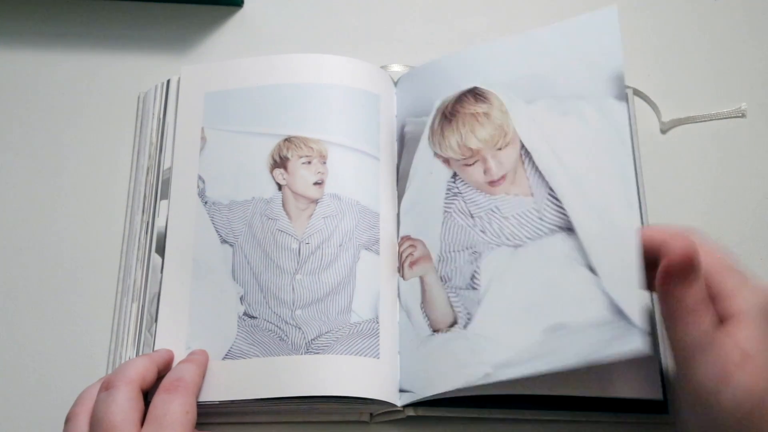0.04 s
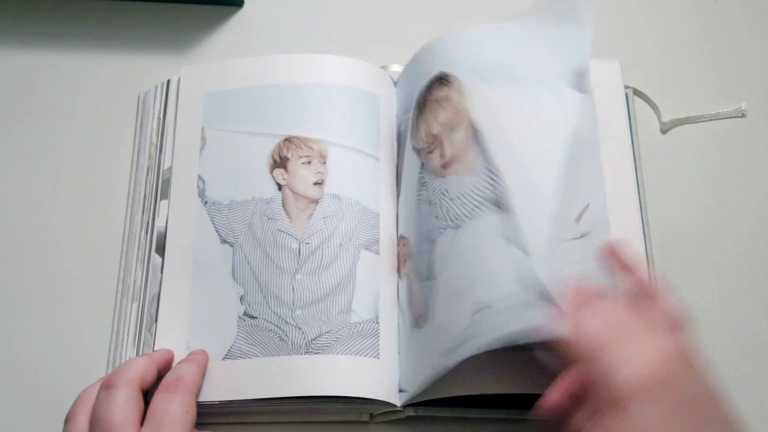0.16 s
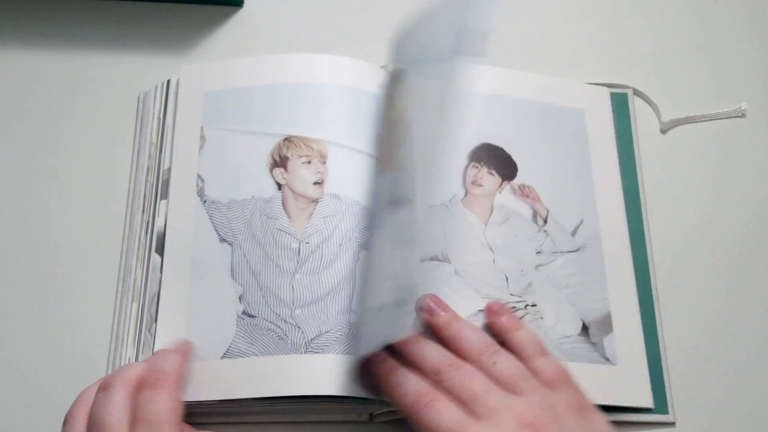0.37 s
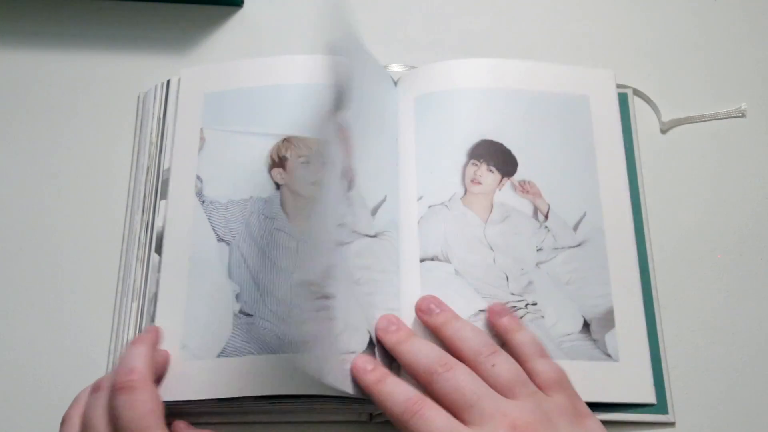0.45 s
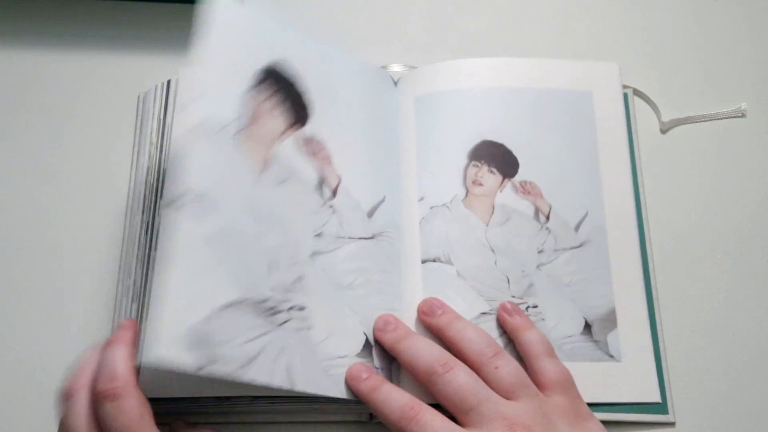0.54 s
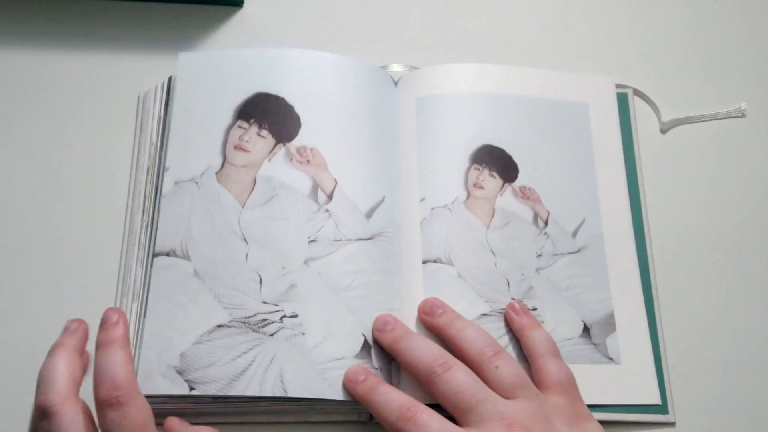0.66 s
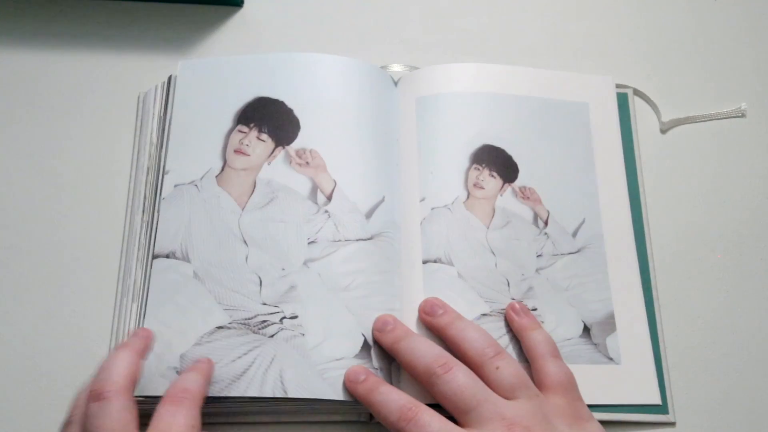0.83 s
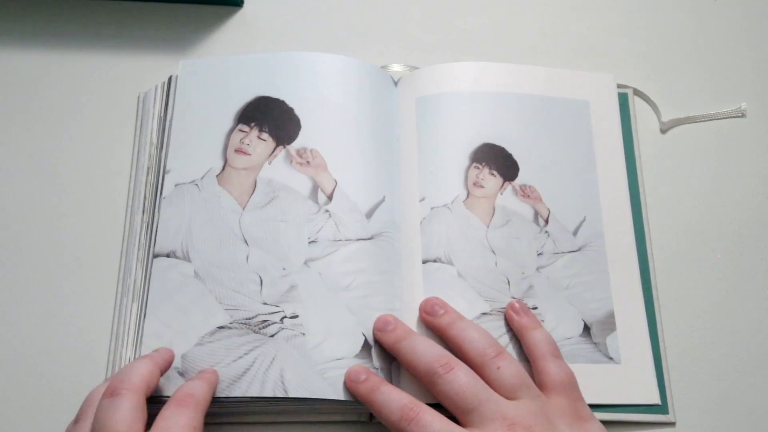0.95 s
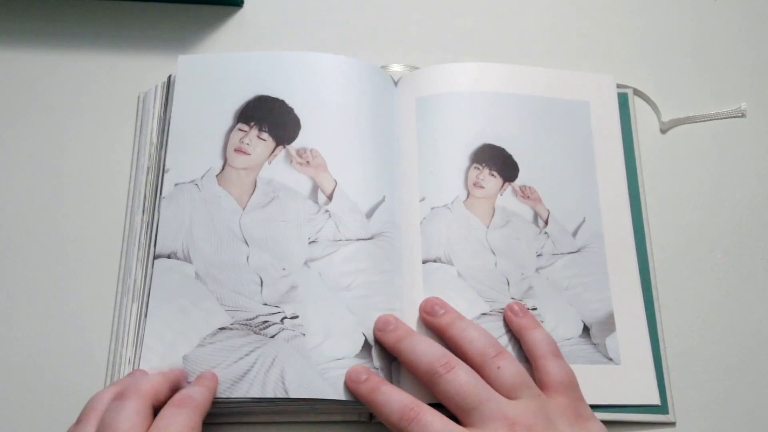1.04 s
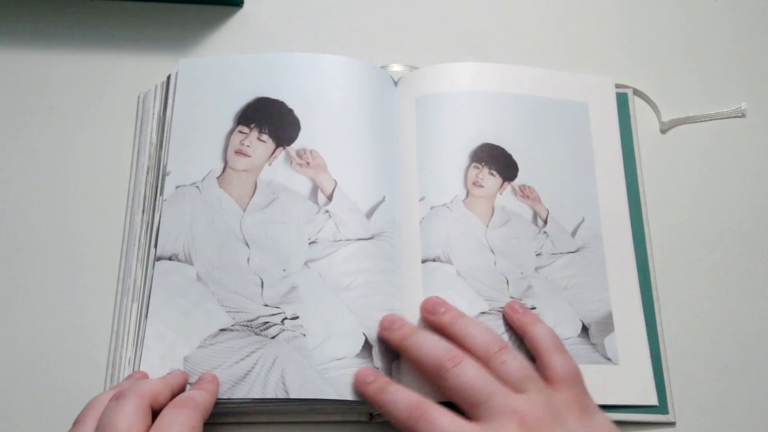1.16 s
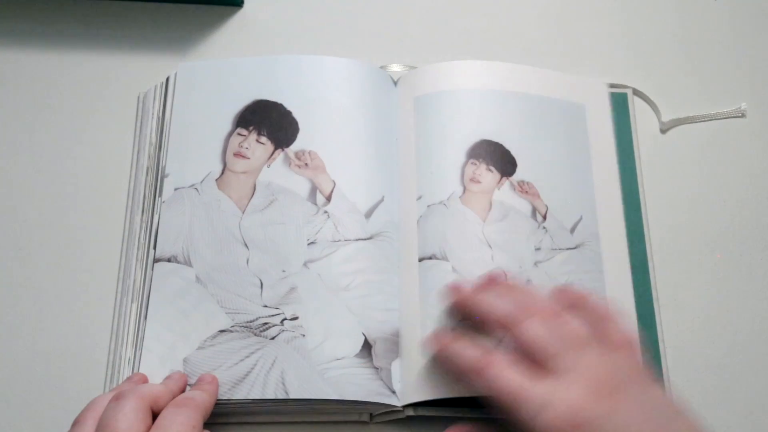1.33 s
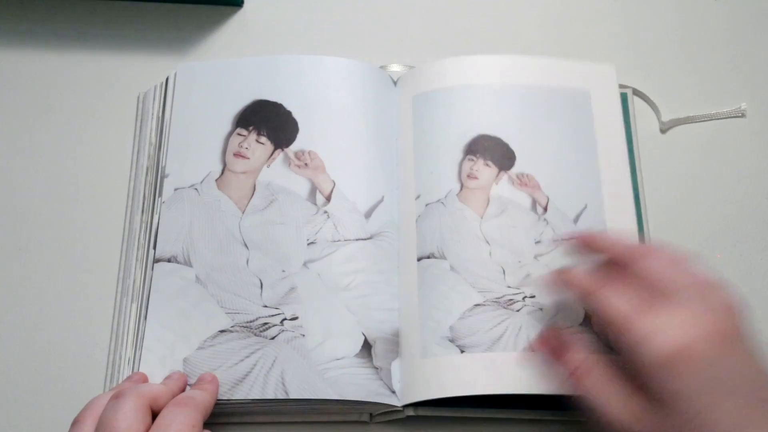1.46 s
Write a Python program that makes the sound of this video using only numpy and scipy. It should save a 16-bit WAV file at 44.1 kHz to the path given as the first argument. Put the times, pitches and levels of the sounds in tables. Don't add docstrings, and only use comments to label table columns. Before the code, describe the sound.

A stiff glossy book page turns with a sharp snap, papery crackle and soft pat

```python
import sys
import numpy as np
from scipy import signal
from scipy.fft import rfft, irfft
from scipy.io import wavfile
from scipy.ndimage import uniform_filter1d

SR = 44100
rng = np.random.default_rng(int(sys.argv[2]) if len(sys.argv) > 2 else 0)


def bounce(signal):
    frames = np.transpose(np.atleast_2d(signal))
    limited = np.clip(frames, -1, 1)
    pcm = np.round(limited * 32767).astype(np.int16)
    wavfile.write(sys.argv[1], SR, pcm)


def magnitude_from_level(level_db):
    exponent = np.asarray(level_db, float) / 20
    return 10 ** exponent


N = 66150

# start t/s, rise/s, 60 dB fall/s, level/dB, brightest f/Hz
SLIDES = [(.0, 0.0004, .28, -36, 8600), (.0, 0.0014, 0.26, -44, 750), (.1, 0.043, .4, -54, 1190),
          (.02, 0.045, .25, -48, 6300), (0.136, 0.081, 0.57, -51, 9400), (0.22, 0.027, .14, -37.5, 5700),
          (0.221, 0.022, 0.08, -47, 9300), (.325, 0.013, 1, -61, 8900), (0.443, 0.035, 0.21, -49, 6000),
          (.575, 0.015, 0.33, -59.5, 8380), (.637, 0.002, 0.17, -51, 9600), (.683, 0.008, 0.12, -54, 9300),
          (1.237, .003, .3, -65, 8600), (1.28, .01, 0.23, -67.5, 7500), (1.34, 0.081, .25, -62, 8800),
          (1.06, 0.028, .2, -72, 4870), (1.44, 0.018, 0.32, -63, 3300)]
# f/Hz, level/dB
GLOSS_COLOUR = [(88, -58), (150, -29.5), (500, -10), (1030, -14.5), (2150, -5.5), (3160, -8.5), (5670, -12),
                (12600, -18.5), (15600, -43.5)]
# start t/s, rise/s, 60 dB fall/s, level/dB, f/Hz
SQUEAKS = [(.0, 0.019, 0.23, -44.5, 2748), (.02, 0.02, 0.3, -49, 2150), (.045, 0.03, 0.14, -44.5, 5640),
           (.216, 0.0066, 0.031, -37.5, 5530), (.313, .01, 0.12, -68, 9100), (.32, .025, .3, -44.5, 370),
           (.222, 0.024, .08, -44, 9600), (.142, .01, .3, -58, 9100), (.148, .006, .1, -58, 10900),
           (1.237, .003, .2, -64, 9600), (1.237, .003, .2, -66, 7500), (.0, .004, .2, -45, 4400),
           (0.248, 0.0094, .08, -34, 3800), (.228, 0.021, .1, -39, 5550), (.475, 0.025, .18, -57, 5100),
           (0.6373, .002, 0.17, -54, 4330), (.642, .004, .06, -55, 2860), (.686, .008, .08, -63, 5680),
           (.75, 0.022, 0.056, -58.5, 2310), (.772, 0.014, 0.066, -40.5, 800), (1.05, .05, .2, -79.5, 6900),
           (1.295, .015, .2, -62.5, 900), (1.455, 0.011, .2, -67, 490), (1.27, .02, .2, -67, 3300)]
# f/Hz, level/dB
AIR_COLOUR = [(59, -61.5), (100, -33), (467, -18), (519, -16.5), (776, -15.5), (1160, -15.5), (3470, -18),
              (5300, -36.5), (15600, -41.5)]
# t/s, level/dB
FAN_SWELL = [(0, -66), (.2, -63), (.52, -66), (.67, -73), (.85, -64.5), (1.07, -68.5), (1.125, -61),
             (1.2, -70), (1.245, -76), (1.3, -67), (1.39, -64), (1.46, -70), (1.5, -75)]
# t/s, effort level/dB, stiffness f/Hz
SWING = [
    (.221, -77, 900),
    (.226, -29.5, 900),
    (.243, -30, 1090),
    (.256, -24, 1500),
    (.272, -28.5, 1340),
    (.285, -25.5, 1790),
    (.38, -30.5, 1510),
    (.47, -40, 1175),
    (.57, -66.5, 1106),
]
# t/s, effort level/dB, stiffness f/Hz
SETTLE = [
    (.694, -72, 1350),
    (.703, -40.5, 1300),
    (.745, -47, 950),
    (.762, -42, 1040),
    (.787, -46, 850),
    (.805, -56, 950),
    (.86, -74, 1000),
]
# f/Hz, level/dB
SHEET_COLOUR = [(35, -87), (60, -53), (239, -22), (321, -31.5), (372, -10), (1200, -1.5), (2670, -6.5),
                (5110, -32), (9000, -55.5), (11700, -68), (19800, -120)]
# f/Hz, level/dB
PAT_COLOUR = [(88, -72), (150, -36.5), (356, -19.5), (425, -19.5), (799, -3.5), (925, -8), (1200, -11),
              (1800, -21), (5000, -60), (6500, -80), (11000, -120)]
# t/s, level/dB, f/Hz
LIFT_CREASES = [(0.2272, -20.8, 1220), (0.2305, -19.8, 1090), (0.2373, -23.7, 1260), (0.2401, -23.3, 1090),
                (0.2432, -33.5, 1690), (0.2462, -21.6, 1170), (0.2493, -17.3, 1330), (0.2537, -15.6, 1150),
                (0.2565, -12.1, 1500), (0.2594, -16.9, 1810), (0.2632, -11.3, 2160), (0.2659, -14.6, 1570)]
# t/s, level/dB, f/Hz
SWING_CREASES = [(0.2883, -14.0, 1860), (0.3031, -16.0, 2070), (0.3067, -17.6, 1910), (0.3129, -18.9, 1940),
                 (0.318, -16.3, 1770), (0.3215, -20.2, 1320), (0.3262, -18.5, 1460), (0.3305, -21.1, 1500),
                 (0.3402, -20.3, 1700), (0.3454, -18.8, 1560), (0.3522, -19.8, 1670), (0.359, -21.4, 1210),
                 (0.3709, -20.9, 1320), (0.3765, -17.4, 1320), (0.3824, -23.0, 1520), (0.3892, -22.2, 1730),
                 (0.3971, -25.0, 1480), (0.4021, -26.6, 1400), (0.4073, -23.7, 1610), (0.4108, -24.7, 1540),
                 (0.4143, -26.0, 1440), (0.4201, -29.0, 1700), (0.4233, -25.5, 1540), (0.4317, -24.9, 1510),
                 (0.437, -29.8, 1900), (0.4445, -31.1, 1100), (0.4504, -30.1, 1220), (0.4562, -30.2, 1470),
                 (0.4613, -30.0, 1080), (0.4656, -30.5, 1460)]
# t/s, level/dB, f/Hz
PAT_CREASES = [(0.7038, -18.8, 1210), (0.7106, -23.9, 1330), (0.719, -30.7, 860), (0.7244, -29.9, 1080),
               (0.7291, -35.5, 880), (0.7376, -35.4, 1110), (0.7429, -36.9, 1030), (0.7534, -40.7, 750),
               (0.7576, -36.3, 890), (0.762, -34.1, 850), (0.768, -31.0, 880), (0.7728, -35.4, 920),
               (0.782, -36.5, 840), (0.786, -36.9, 850), (0.7945, -42.9, 1030), (0.7984, -44.8, 850)]
# peak t/s, level/dB, f/Hz, length/cycles, glide/share
SNAPS = [(.228, -24, 1380, 6, .05), (.2563, -18, 1550, 6, .1), (.251, -20, 810, 7, .06),
         (.233, -25, 760, 4, .06), (.2795, -14.5, 2100, 3, .19), (.2835, -12, 1500, 4, -.2),
         (.2625, -24, 3800, 5, .1), (.7005, -32, 700, 2.4, .068), (.71, -42, 2100, 9, .1),
         (.7055, -28, 700, 2.3, .085), (.7036, -27, 1470, 6, .068)]
# t/s, level/dB, f/Hz, length/cycles
TICKS = [(.2771, -36, 10500, 4), (.2771, -37, 6300, 3), (.2771, -43, 14300, 6), (.275, -44, 7000, 2),
         (.2632, -54, 13000, 3), (.334, -54, 9000, 4), (.4498, -46, 5270, 6), (.4513, -50, 7660, 8),
         (.4663, -42, 11500, 5), (.4663, -44, 13600, 6), (.4666, -50, 9300, 6), (.4741, -39, 5050, 9),
         (.4738, -41.5, 6300, 5), (.487, -39, 5600, 3), (.487, -45, 7900, 4), (.4902, -51, 8400, 5),
         (.639, -47, 7200, 1.5), (.6455, -43, 4330, 9), (.65, -48, 4400, 7), (.6562, -49, 6600, 2),
         (.689, -52, 9000, 6), (.775, -66, 5600, 14), (1.121, -59, 6900, 18), (1.2344, -49, 9600, 18),
         (1.2355, -37, 9600, 9), (1.2357, -40, 7400, 8), (1.2378, -50, 7600, 5), (1.2408, -51, 9700, 9),
         (1.2408, -53, 7500, 7), (1.2457, -53, 9500, 12), (1.2378, -58, 500, 1.2)]


def evened(x):
    return x / np.sqrt(np.mean(x ** 2) + 1e-20)


def colour(x, points):
    f, db = np.transpose(points)
    hz = np.fft.rfftfreq(len(x), 1 / SR)
    return irfft(rfft(x) * magnitude_from_level(np.interp(np.log(hz + 1), np.log(f + 1), db)), len(x))


def add(mix, s, sound):
    part = mix[max(round(s * SR), 0):][:len(sound)]
    part += sound[:len(part)]


def highpass(x, hz, order=4):
    return signal.sosfilt(signal.butter(order, hz, "high", fs=SR, output="sos"), x)


def ringing(x, hz, width_hz):
    b, a = signal.iirpeak(min(hz, SR / 2.2), hz / width_hz, SR)
    return signal.lfilter(b, a, signal.lfilter(b, a, x))


def patchy(x, depth_db, size):
    z = signal.stft(x, nperseg=256)[2]
    field = uniform_filter1d(rng.standard_normal(z.shape), size[0], axis=0)
    field = uniform_filter1d(field, size[1], axis=1)
    return evened(signal.istft(z * magnitude_from_level(depth_db * evened(field)), nperseg=256)[1][:len(x)])


def chirp(hz, cycles, glide):
    t = np.arange(-cycles / hz, cycles / hz, 1 / SR)
    u = t * hz / cycles
    bell = np.exp(-4 * u ** 2)
    return cycles / hz, bell * np.sin(2 * np.pi * hz * t * (1 + glide * u / 2) + 1)


def add_chirp(mix, s, db, hz, cycles, glide):
    lead, shape = chirp(hz, cycles, glide)
    add(mix, s - lead, magnitude_from_level(db) * shape)


def stroke(rise, t60, db, sound):
    t = np.arange(len(sound)) / SR
    swell = (t / max(rise, 1e-4)) ** 1.2
    fall = magnitude_from_level(-60 * (t - rise) / t60)
    return magnitude_from_level(db) * np.where(t < rise, swell, fall) * evened(sound)


def slides():
    whistle_width, whistle_db = .35, -3.5
    fast_db, dulling = -40.5, 0.72
    out = np.zeros(N)
    for s, rise, t60, db, hz in SLIDES:
        grain = patchy(rng.standard_normal(SR // 2), 3.3, size=(3, 14))
        hiss = colour(grain, GLOSS_COLOUR)
        hiss = signal.lfilter(*signal.butter(1, min(1.7 * hz + 7000, 20000), fs=SR), hiss)
        low = signal.sosfiltfilt(signal.butter(2, 4200, fs=SR, output="sos"), hiss)
        body = magnitude_from_level(dulling * min(db - fast_db, 0))
        hiss = evened(hiss - low * (1 - body))
        whistle = evened(ringing(grain, hz, hz * whistle_width))
        add(out, s, stroke(rise, t60, db, hiss + magnitude_from_level(whistle_db) * whistle))
    return out


def squeaks():
    out = np.zeros(N)
    for s, rise, t60, db, hz in SQUEAKS:
        tone = ringing(rng.standard_normal(SR // 2), hz, hz * .065)
        add(out, s, stroke(rise, t60, db, tone))
    return out


def hum():
    t = np.arange(N) / SR
    fan_hz, fan_width_hz, rise_db_per_s = 1216, 110, 2
    air = patchy(colour(rng.standard_normal(N), AIR_COLOUR), 3.2, size=(3, 24))
    air *= magnitude_from_level(rise_db_per_s * (t - 2))
    waver_db = 1.0 * evened(uniform_filter1d(rng.standard_normal(N), size=3000))
    fan = evened(ringing(rng.standard_normal(N), fan_hz, fan_width_hz))
    return magnitude_from_level(-61.5) * air + magnitude_from_level(np.interp(t, *np.transpose(FAN_SWELL)) + waver_db) * fan


def bump():
    return magnitude_from_level(-50) * np.exp(-np.arange(N) / SR / 0.002)


def crackle(bend, spectrum, usual_hz):
    creases_per_s, spread_db = 6500, 1.5
    s, effort_db, stiff_hz = np.transpose(bend)
    t = np.arange(N) / SR
    size = magnitude_from_level(spread_db * np.minimum(rng.exponential(1, N), 5)) * rng.choice([-1, 1], N)
    luck, kind, out = rng.random(N), rng.integers(0, 36, N), np.zeros(N)
    shift = np.interp(t, s, stiff_hz) / usual_hz
    f, db = np.transpose(spectrum)
    for k, hz in enumerate(np.geomspace(200, 6000, num=36)):
        struck = (luck < creases_per_s / SR * hz / 1500) * (kind == k)
        unshifted_hz = hz / shift ** np.clip(np.log2(hz / 400.0), 0, 1)
        weight = magnitude_from_level(np.interp(np.log(unshifted_hz), np.log(f), db)) * np.sqrt(hz)
        out += signal.oaconvolve(size * struck * weight, chirp(hz, 6, .1)[1], "same")
    out /= np.sqrt(abs(uniform_filter1d(out ** 2, size=1500)) + 1e-12)
    return out * magnitude_from_level(np.interp(t, s, effort_db, left=-120, right=-120))


def sheet_crackle():
    sheet = crackle(SWING, SHEET_COLOUR, 1500) + crackle(SETTLE, PAT_COLOUR, 950)
    return highpass(magnitude_from_level(-1.8) * sheet, 190)


def creases():
    out = np.zeros(N)
    for table, cycles in ((LIFT_CREASES, 1.7), (SWING_CREASES, 1.7), (PAT_CREASES, 3.2)):
        for s, db, hz in table:
            add_chirp(out, s, db - 2.5, hz, cycles, .1)
    return out


def snaps():
    out = np.zeros(N)
    for s, db, hz, cycles, glide in SNAPS:
        add_chirp(out, s, db, hz, cycles, glide)
    return out


def buckle():
    build_s, die_s, first_share = .0025, .0008, .47
    start_hz, whip_hz = 1640, 620
    t = np.arange(0, .008, 1 / SR)
    u = t / build_s
    hz = start_hz + whip_hz * np.minimum(u, 1.3) ** 3.68
    build = first_share + (1 - first_share) * u ** 4
    size = np.where(u < 1, build, np.exp(-(t - build_s) / die_s))
    jump = np.minimum(t / 0.00017, 1)
    out = np.zeros(N)
    add(out, .27475, magnitude_from_level(.3) * jump * size * np.sin(2 * np.pi * np.cumsum(hz) / SR))
    return out


def ticks():
    out = np.zeros(N)
    for s, db, hz, cycles in TICKS:
        add_chirp(out, s, db, hz, cycles, 0)
    return out


def room(x):
    t = np.arange(SR // 4) / SR
    t60 = 0.19
    tail = rng.standard_normal(len(t)) * magnitude_from_level(-60 * t / t60) * (t > .002)
    tail = signal.lfilter(*signal.butter(3, 4500, fs=SR), tail)
    return signal.fftconvolve(x, tail / np.linalg.norm(tail))[:N]


def hush():
    since = np.arange(N) / SR - .279
    return magnitude_from_level(-22 * (since > 0) * np.exp(-(since / .04) ** 4))


def scene():
    quiet = hush() * (slides() + squeaks() + hum())
    hits = highpass(creases() + snaps() + buckle() + ticks(), 300)
    mix = quiet + bump() + sheet_crackle() + hits + magnitude_from_level(-14) * room(hits)
    return mix[None]


def low_pass(x):
    return signal.sosfilt(signal.butter(12, 15710, fs=SR, output="sos"), x)


def record(dry):
    x = highpass(dry - 0.022 * dry ** 2, 30, order=2)
    x = signal.oaconvolve(x, signal.firwin(255, 15750, fs=SR)[None], "same")
    return low_pass(x)


dry = scene()
out = record(dry)
bounce(out)
```